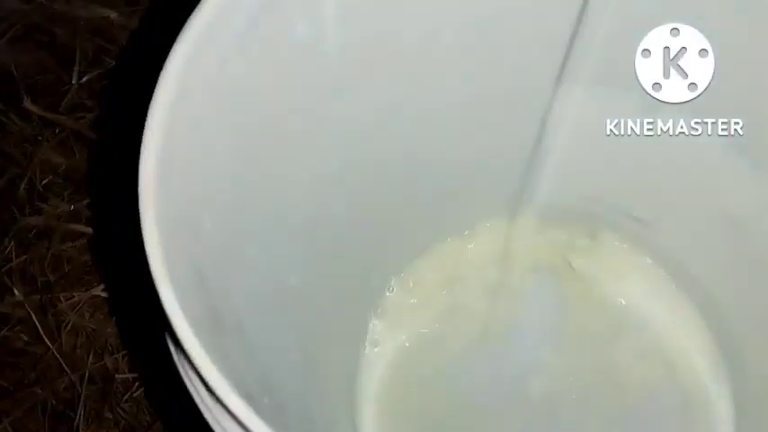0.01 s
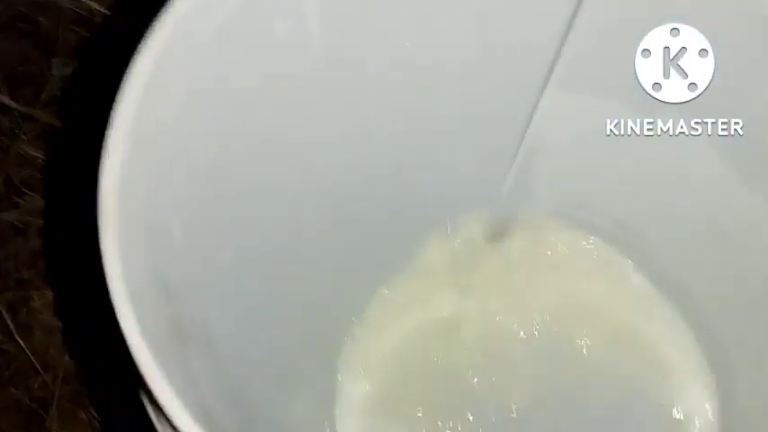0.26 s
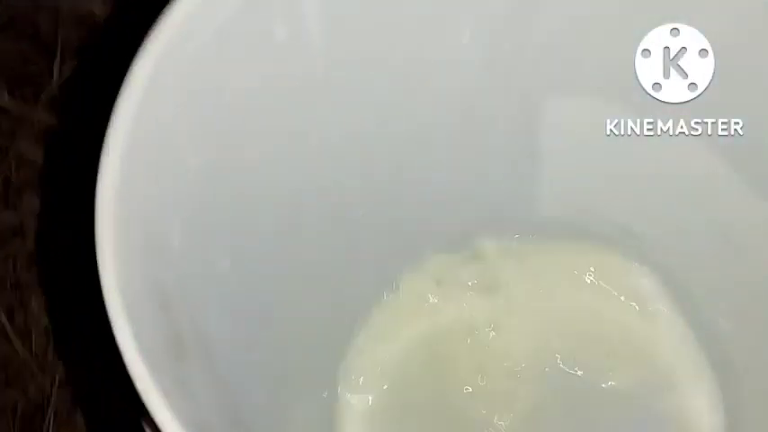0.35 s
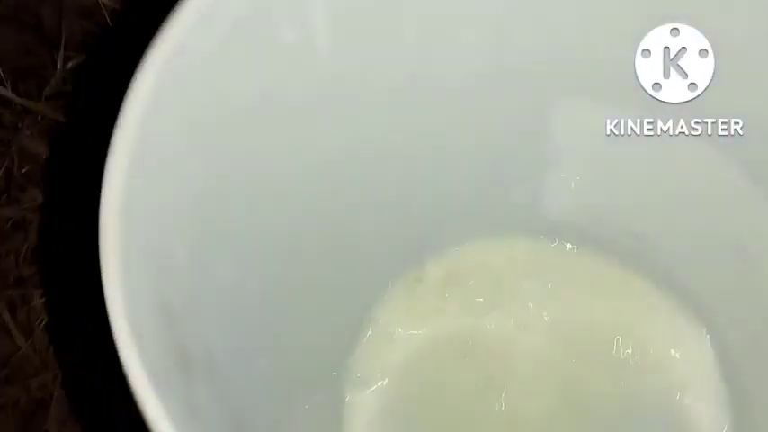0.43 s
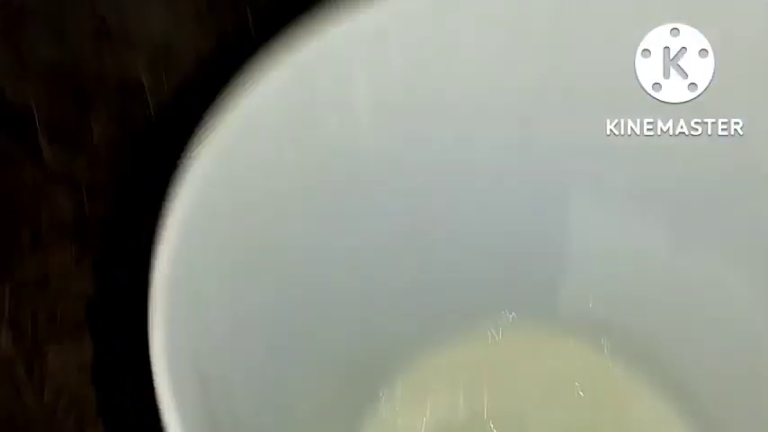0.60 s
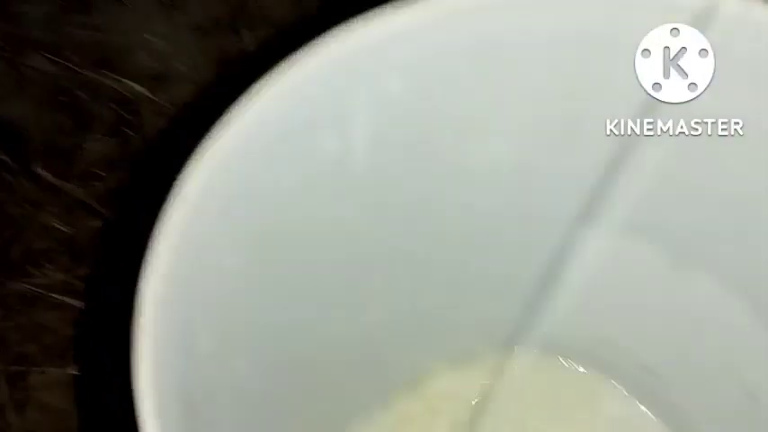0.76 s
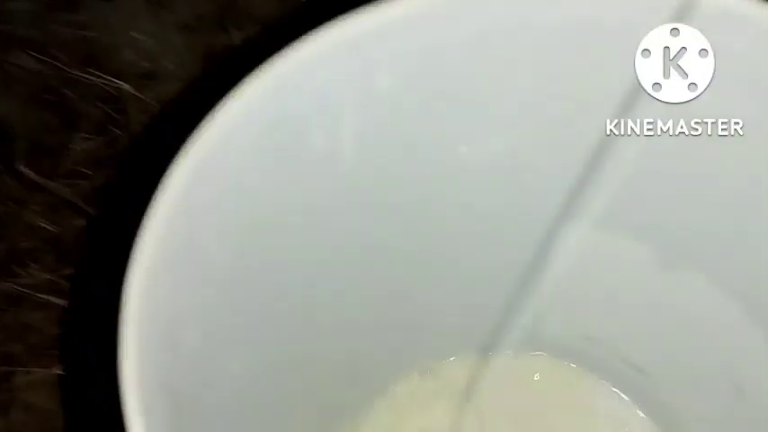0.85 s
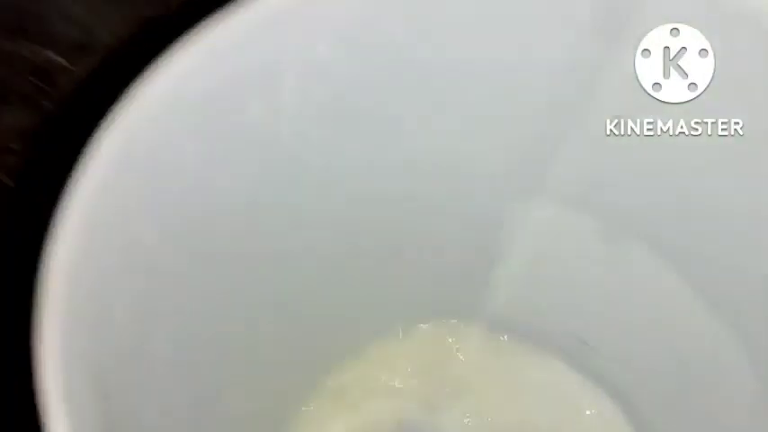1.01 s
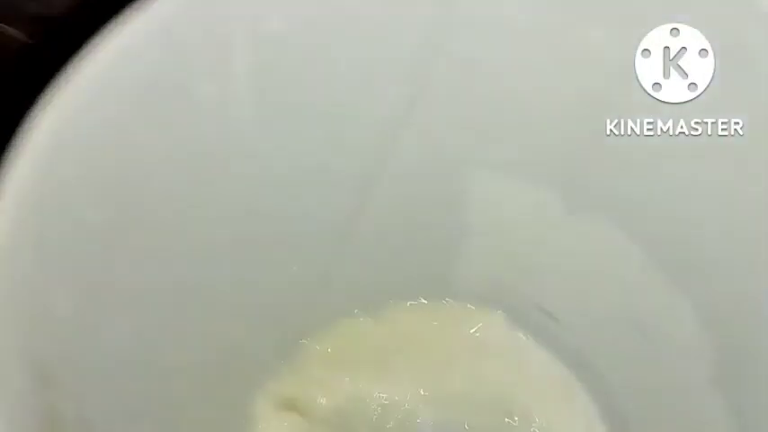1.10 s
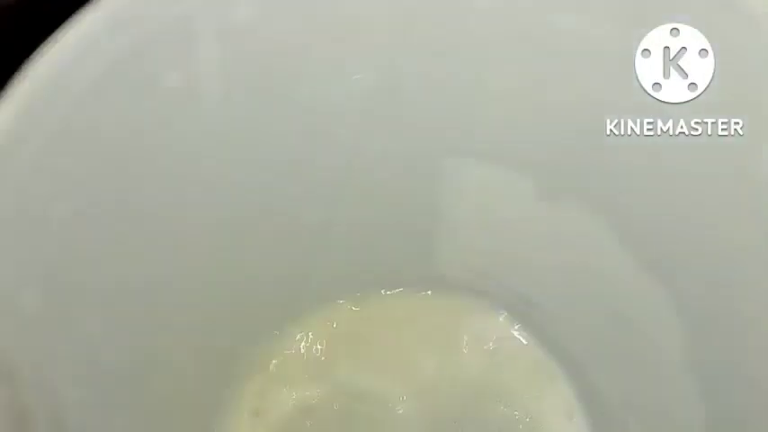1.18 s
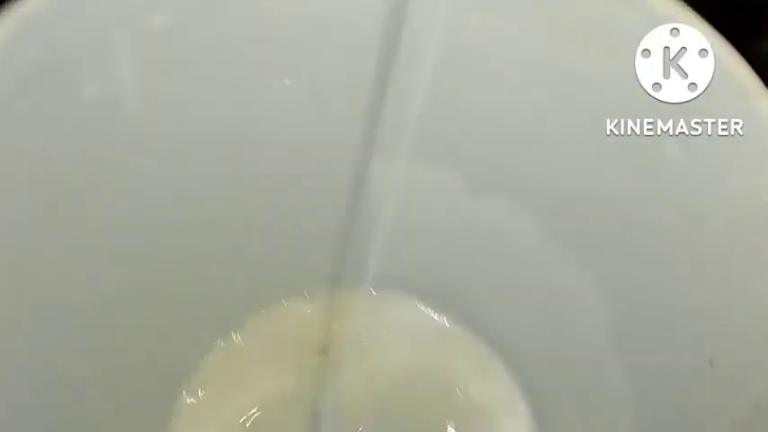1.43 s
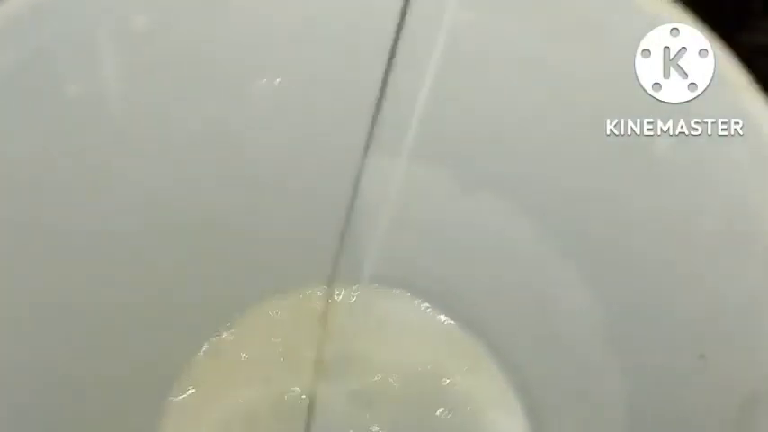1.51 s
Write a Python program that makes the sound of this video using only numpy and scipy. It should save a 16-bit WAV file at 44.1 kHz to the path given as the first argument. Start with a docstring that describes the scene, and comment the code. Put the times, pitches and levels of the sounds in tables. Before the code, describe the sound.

Milk squirts into a plastic bucket twice as a cow is milked by hand. Each jet splashes, bubbles and drums on the bottom, the first ending in a squelch. Stray drips tick close by, over a quiet shed's low hum.

```python
"""In a quiet shed, a cow is milked by hand into a plastic bucket, over a low background hum.
Two jets, one after the other, drill into the frothy milk. Each breaks into drops that splash, spray,
drum on the bottom and whip up bubbles, and the air in the bucket rings. The first ends in a squelch.
Around the jets, stray drips tick, the bucket thumps softly and the foam crackles faintly."""
import sys
import numpy as np
from scipy.fft import rfft, irfft
from scipy.io import wavfile
from scipy.ndimage import map_coordinates

SR = 44100
rng = np.random.default_rng(int(sys.argv[2]) if len(sys.argv) > 2 else 0)


def unload_wav(signal):
    """Save mono or channel-first audio to the path in sys.argv[1] as 16-bit WAV at rate SR, clipped to [-1, 1]."""
    wavfile.write(
        sys.argv[1],
        SR,
        np.round(np.clip(np.atleast_2d(signal).T, -1, 1) * 32767).astype(np.int16),
    )


N = 68355
SILENT_DB, TOP_HZ = -140, 15900


def amp(db):
    """Turn decibels into a number to multiply by."""
    return 10 ** (np.asarray(db) / 20)


def unit(x):
    """Scale a sound to an average strength (rms) of 1."""
    return x / np.sqrt(np.mean(x ** 2) + 1e-20)


def along(points, hz):
    """Read between (frequency, value) points, on a scale of octaves."""
    f, values = np.transpose(points)
    return np.interp(np.log(hz + 1), np.log(f + 1), values)


def grid():
    """The frequencies on which filters are laid out."""
    return np.fft.rfftfreq(2 * N, 1 / SR)


def filtered(x, response):
    """Pass a sound through a filter."""
    return irfft(rfft(x, 2 * N) * response)[..., :N]


def colour(points):
    """A filter shaped by (frequency, level) points; it rings only after a hit, never before."""
    cepstrum = irfft(np.log(amp(np.maximum(along(points, grid()), -100))))
    return np.exp(rfft(cepstrum * np.r_[1, np.full(N - 1, 2), np.zeros(N)]))


def neutral(response):
    """Scale a filter so that white noise keeps its power."""
    return response / np.sqrt(np.mean(np.abs(response) ** 2))


def wobble(rate):
    """A smooth curve through `rate` random values a second."""
    values = rng.standard_normal(int(N * rate / SR) + 4)
    return map_coordinates(values, [np.arange(N) * rate / SR])


def clicks(per_s, spread_db):
    """Tiny hits of uneven size at random moments."""
    size = amp(spread_db * rng.standard_normal(N).clip(-2, 2)) * rng.choice([-1, 1], N)
    return unit(size * (rng.random(N) < per_s / SR))


# How alike the two ears hear each frequency: f/Hz, likeness (1 = the same)
EAR_LIKENESS = [(25, 0.1), (70, .55), (150, 0.46), (300, 0.69), (700, 0.62), (1300, 0.17), (2000, .05),
                (5000, 0.02), (12000, 0.02)]
def stereo(pair):
    """Blend two unrelated spectra into left and right, most alike in the low notes."""
    turn = np.arccos(np.clip(along(EAR_LIKENESS, grid()), -1, 1)) / 2
    mid, side = pair[0] * np.cos(turn), pair[1] * np.sin(turn)
    return np.array([mid + side, mid - side])


def echoes(fade_s):
    """A filter of crowded echoes that die away by 60 dB in fade_s."""
    tail = rng.standard_normal((2, N)) * amp(-60 * np.arange(N) / SR / fade_s)
    return neutral(stereo(rfft(tail, 2 * N)))


# Tone of the shed's hum: f/Hz, relative level/dB
SHED_TONE = [(12, -30), (22, -5.5), (42, -9.5), (70, -12), (116, -21.5), (274, -21), (372, -18.5),
             (465, -28.5), (686, -30.5), (811, -30), (1070, -34.5), (1500, -39), (5000, -43), (15500, -57)]
def shed(level_db=-56.5):
    """The shed hums: low noise that gently swells and sinks."""
    white = stereo(rfft(rng.standard_normal((2, 2 * N))))
    hum = irfft(white * amp(along(SHED_TONE, grid())))[:, :N]
    return unit(hum) * amp(level_db + 1.5 * wobble(6.7))


# Tone of bursting foam: f/Hz, relative level/dB
FOAM_TONE = [(800, -18), (2500, 3.5), (6000, -2), (8300, -20), (13000, 1), (16000, 1)]
def foam(level_db=-70.5):
    """Tiny bubbles burst in the foam, a faint crackle all the time."""
    pops = clicks(per_s=490, spread_db=3.5)
    return amp(level_db) * unit(filtered(pops, echoes(fade_s=0.006) * colour(FOAM_TONE)))


def ping(hz, t, cycles, rise=0.08):
    """A note that rises a little as it fades, by 60 dB over `cycles` vibrations."""
    age = hz * t / cycles
    onset = 1 - np.exp(-2 * hz * t)
    return np.sin(2 * np.pi * hz * t * (1 + rise * age / 2)) * amp(-60 * age) * onset


def rings(table, cycles):
    """Play one ping for each (time, frequency, level) row."""
    t = np.arange(N) / SR
    return sum(amp(db) * ping(hz, np.maximum(t - start, 0), cycles) for start, hz, db in table)


# Soft thumps of the bucket: t/s, f/Hz, level/dB
BUCKET_THUMPS = [(.135, 110, -44), (.196, 160, -35), (0.683, 130, -45), (.745, 260, -45), (.889, 75, -58),
                 (.893, 170, -33.5), (1.461, 300, -40.5)]
def thumps():
    """The bucket thumps, each time with one short, low note."""
    return rings(BUCKET_THUMPS, cycles=18)


# Notes of the air in the bucket: f/Hz, width/Hz, relative level/dB, left-right phase/rad
AIR_NOTES = [(785.3, 35, -1, .2), (883, 34, -1.5, 0.8), (1079, 32, -1.5, 0.6), (1175, 18, -15, 2),
             (1286, 15, -3.5, -0.7), (1336, 29, -2, 0.3), (1399.5, 32, 1, 1.34), (1741, 39, -1.5, 4.5),
             (1984, 48, 0, -1.87), (2120, 39, -4, -2.1), (2330, 47, 0.5, 3.9), (2606, 40, 0.5, 1.57),
             (3143, 42, 1, -4), (3786, 59, 1.5, 3.96)]
def bucket(air_db=8.5, wall_db=3):
    """The bucket as a filter, from one spot: its air rings, and wall echoes take over in the highs."""
    t = np.arange(SR // 8) / SR
    air = 0
    for hz, width, db, phase in AIR_NOTES:
        fade = amp(db) * 2 * np.pi * width / SR * np.exp(-np.pi * width * t)
        air = air + fade * np.cos(2 * np.pi * hz * t + np.array([[phase], [-phase]]) / 2)
    wall = echoes(fade_s=0.047) * amp(along([(600, -3.5), (1200, -2), (3000, 0)], grid()))
    direct = amp(along([(1000, 0), (2500, -10)], grid()))
    return direct + amp(wall_db) * wall + amp(air_db) * rfft(air, 2 * N)


# Stray drips: t/s, peak level/dB, centre f/Hz
STRAY_DRIPS = [(.138, -43, 2200), (.184, -30.5, 5030), (.549, -32, 1330), (.682, -39, 1700),
               (.696, -40.5, 3800), (.716, -46.5, 3000), (0.724, -49.5, 12500), (.738, -50.5, 6000),
               (.856, -58, 3000), (0.8917, -27.5, 2110), (0.8913, -24, 13600), (.908, -19.5, 1200),
               (1.331, -30.5, 4800), (1.346, -28.5, 5000), (1.364, -38, 2760), (1.408, -42.5, 1190),
               (1.419, -45, 13000), (1.442, -43, 3300), (1.456, -42.5, 2800)]
def drips(fade_s=0.0073, width_octaves=0.59):
    """Single drops tick on the froth and the wall."""
    t, body, out = np.arange(N) / SR, bucket(), np.zeros((2, N))
    for start, db, hz in STRAY_DRIPS:
        burst = rng.standard_normal(N) * (t >= start) * amp(-60 * np.abs(t - start) / fade_s)
        octaves_away = np.log2((grid() + 1) / hz)
        tick = filtered(burst, body / (1 + (octaves_away / width_octaves) ** 2))
        out += amp(db) * tick / np.abs(tick).max()
    return out


# Large bubbles: t/s, f/Hz, level/dB
BIG_BUBBLES = [(.229, 966, -18.5), (.305, 872, -19), (.461, 308, -28.5), (1.252, 334, -28.5)]
def gulps():
    """Large bubbles ring one at a time in the milk."""
    return rings(BIG_BUBBLES, cycles=31)


# The squelch that ends the first jet: t/s, f/Hz, relative level/dB
SQUELCH_SLIDE = [(.392, 2600, -48), (.406, 2297, -33), (.421, 1900, -31.5), (.431, 1335, -29.5),
                 (0.44, 980, -34), (.45, 900, -61)]
def squelch(waver=0.079, rough_db=2.5):
    """A wavering pocket of air whose note falls as the jet lets up."""
    t = np.arange(N) / SR
    times, hz, db = np.transpose(SQUELCH_SLIDE)
    pitch = np.interp(t, times, hz) * (1 + waver * wobble(500))
    level = amp(np.interp(t, times, db, SILENT_DB, SILENT_DB) + rough_db * wobble(298.8))
    note = level * np.sin(2 * np.pi * np.cumsum(pitch) / SR)
    return amp(-3.5) * filtered(note, bucket())


# Base pitch of the bubbles, low while the jet digs deep: t/s, f/Hz
BUBBLE_PITCH = [(0.2, 870), (0.315, 983), (0.345, 1257), (0.385, 1325), (0.405, 2110), (0.422, 1890),
                (0.44, 1100), (0.55, 1345), (0.91, 1235), (0.98, 1263), (1.07, 1324), (1.2, 1418),
                (1.32, 1036)]
def froth(pitch_ratio, per_s=650, scatter=0.224, spots=2):
    """Swarms of bubbles ring at spots in the bucket, around pitch_ratio times the base pitch."""
    out, offsets = 0, np.arange(SR // 25)
    for _ in range(spots):
        when, draw, softness = rng.random((int(per_s / spots * N / SR), 3)).T[:, :, None]
        centre = pitch_ratio * np.interp(when * N / SR, *np.transpose(BUBBLE_PITCH))
        hz = np.clip(centre * (draw / (1 - draw)) ** (scatter / 2), 600, 7000)
        strength = amp(-12 * softness) * np.sqrt(hz) * rng.choice([-1, 1], softness.shape)
        pings = strength * ping(hz, offsets / SR, cycles=22.7)
        samples = (when * N).astype(int) + offsets
        swarm = np.bincount(samples.ravel(), pings.ravel(), N)[:N]  # add each ping at its moment
        out = out + filtered(swarm, bucket() * colour([(450, -30.5), (750, -4.5), (2000, -3.5)]))
    return unit(out)


# Notes of the bucket's bottom, under the milk: f/Hz, width/Hz, relative level/dB
BOTTOM_NOTES = [(186, 23, -6), (242, 53, -2.5), (296, 44, 5.5), (344.5, 38, -8)]
# Overall tone of the drumming: f/Hz, relative level/dB
DRUM_TONE = [(70, -37), (150, -1), (340, 2.5), (450, -6), (600, -2.5), (1000, -34.5)]
def drumming(level):
    """Drops beat on the bottom, which answers with a few low, quickly fading notes."""
    f = grid()
    bottom = sum(amp(db) * 1j * f * width / (hz * hz - f * f + 1j * f * width)
                 for hz, width, db in BOTTOM_NOTES)
    hits = level * clicks(per_s=1500, spread_db=1)
    return filtered(hits, neutral(bottom * colour(DRUM_TONE)))


def patter(level, tone, per_s=4500, spread_db=4.5, spots=4):
    """Drops land on several spots, each with its own path through the bucket."""
    shape, out = colour(tone), 0
    for _ in range(spots):
        hits = level * clicks(per_s / spots, spread_db)
        out = out + filtered(hits, neutral(bucket() * shape))
    return out / np.sqrt(spots)


# How each jet swells and fades: t/s, then relative level/dB of splash, spray, fizz, drumming
JET_LEVELS = [
    [(0.184, -60, -41.5, -43, -49), (0.216, -22.5, -39, -34.5, -29), (0.236, -28, -31.5, -39, -36),
     (0.242, -32, -34, -38.5, -32.5), (0.276, -24, -30, -38.5, -32), (0.31, -21.5, -31, -38, -35.5),
     (0.326, -24, -32.5, -37.5, -39.5), (0.38, -25, -29.5, -37.5, -37), (0.4, -25, -40.5, -42.5, -48),
     (0.434, -31, -32.5, -36, -34.5), (0.458, -36, -34, -39, -32), (0.48, -35.5, -45.5, -38.5, -36.5),
     (0.49, -45.5, -50.5, -49.5, -38), (0.54, -47.5, -55.5, -51.5, -52), (0.58, -49.5, -47, -48, -42),
     (0.634, -54.5, -64, -65, -47.5), (0.655, -71, -76, -84, -55)],
    [(0.892, -39.5, -47.5, -48, -44), (0.906, -42.5, -44, -41.5, -41), (0.916, -33.5, -41, -34.5, -33),
     (0.94, -23.5, -32, -42.5, -37.5), (0.972, -25, -34.5, -39, -40.5), (1.07, -27, -31.5, -37, -40.5),
     (1.096, -29, -29.5, -36, -54), (1.12, -27, -30.5, -40, -38.5), (1.152, -28, -32.5, -43.5, -47),
     (1.17, -25.5, -33, -42, -33.5), (1.2, -23.5, -32.5, -40, -40), (1.264, -33.5, -41.5, -52.5, -34),
     (1.288, -34.5, -50, -51, -36), (1.316, -54, -43.5, -47.5, -40), (1.35, -60.5, -54, -53, -54),
     (1.412, -61.5, -61.5, -65, -55.5), (1.425, -70, -83.5, -65, -53.5)],
]
# Tones of the splash (one list a jet), the higher spray and the highest fizz: f/Hz, relative level/dB
SPLASH_TONES = [
    [(310, -54.5), (520, -19), (699, -25.5), (802, -8.5), (1010, -10.5), (1110, -0.5), (1220, -9),
     (1980, -3.5), (3200, -7), (4160, -55), (7040, -120)],
    [(310, -46), (520, -13.5), (561, -40.5), (619, -9), (772, -5), (879, -12.5), (1370, -6.5), (1640, -8),
     (3200, -9), (4160, -38), (7040, -120)],
]
SPRAY_TONE = [(2000, -40.5), (3000, -5.5), (4000, -2.5), (5300, -1), (7000, -7.5), (8200, -20), (9500, -54)]
FIZZ_TONE = [(6500, -8), (8300, -16), (9600, -4.5), (11000, -11), (12200, -1.5), (13500, 0), (15500, -2),
             (16500, -19)]
# How much louder the left is than the right, one row a jet: splash/dB, spray/dB, fizz/dB
JET_LEANS = [(1, -3.5, 6.5), (-2.5, -3.5, 5.5)]
def jet(levels, splash_tone, lean, flutter_db=0.77):
    """One pull on a teat: drops and bubbles sound in the bucket, and the bottom drums."""
    t = np.arange(N) / SR
    times, *columns = np.transpose(levels)
    flutter = flutter_db * wobble(130)
    splash, spray, fizz, drum = [amp(np.interp(t, times, db, SILENT_DB, SILENT_DB) + flutter)
                                 for db in columns]
    splash_pan, spray_pan, fizz_pan = [amp(np.array([[db], [-db]]) / 2) for db in lean]
    out = splash_pan * amp(-1) * patter(splash, splash_tone)
    out += splash_pan * amp(-4) * splash * froth(pitch_ratio=0.98)
    out += spray_pan * amp(2) * patter(spray, SPRAY_TONE)
    out += amp(-8) * spray * froth(pitch_ratio=2.656)  # smaller bubbles ring higher
    out += fizz_pan * amp(2) * patter(fizz, FIZZ_TONE, per_s=1500, spread_db=3)
    return out + amp(-1.23) * drumming(drum)


def scene():
    """All the sounds in the bucket, with the shed's faint echo and hum."""
    jets = sum(jet(*pull) for pull in zip(JET_LEVELS, SPLASH_TONES, JET_LEANS))
    milk = jets + squelch() + gulps() + thumps() + drips() + foam()
    shed_echo = amp(-21.5) * filtered(milk, echoes(fade_s=0.28))
    return milk + shed_echo + shed()


def record(dry):
    """Cut away the very highest sounds, above TOP_HZ."""
    return filtered(dry, grid() < TOP_HZ)


dry = scene()
out = record(dry)
unload_wav(out)
```